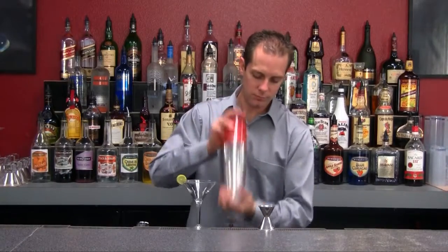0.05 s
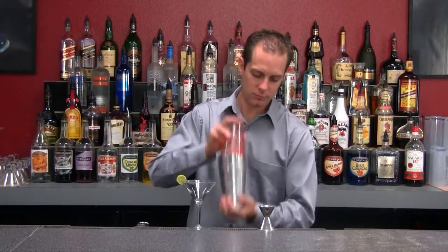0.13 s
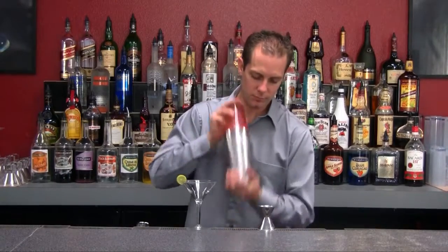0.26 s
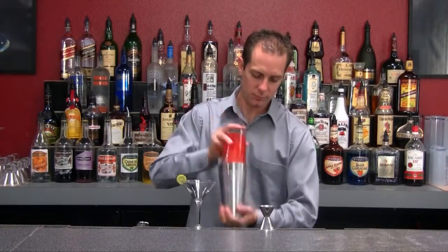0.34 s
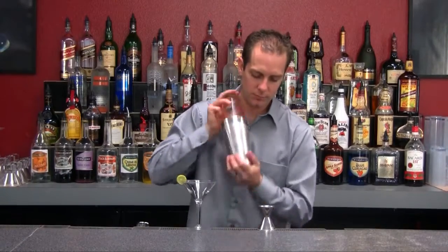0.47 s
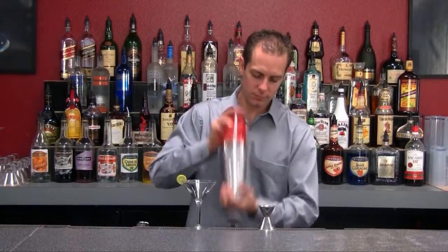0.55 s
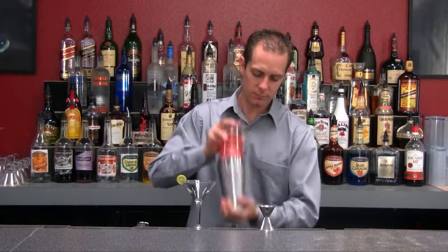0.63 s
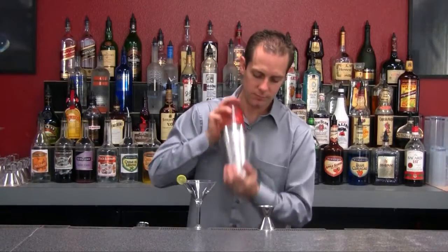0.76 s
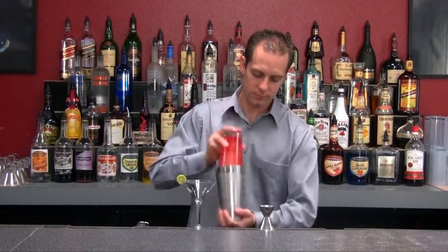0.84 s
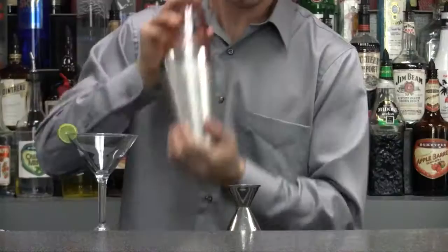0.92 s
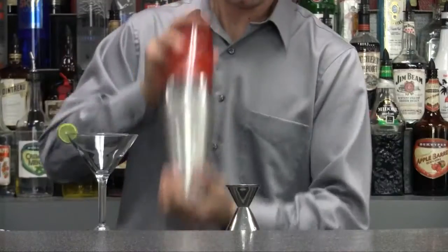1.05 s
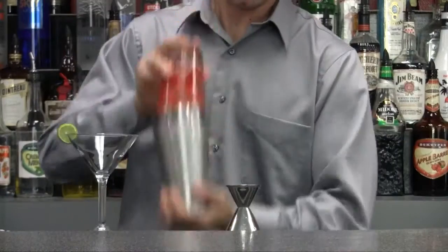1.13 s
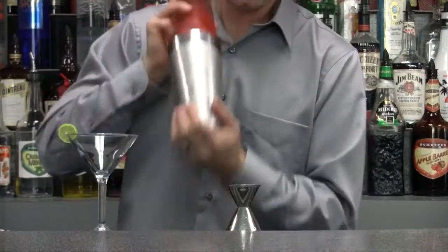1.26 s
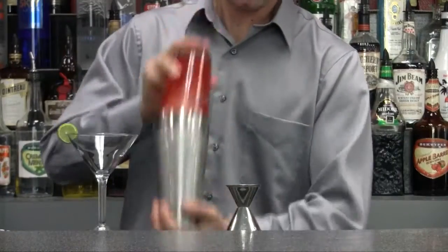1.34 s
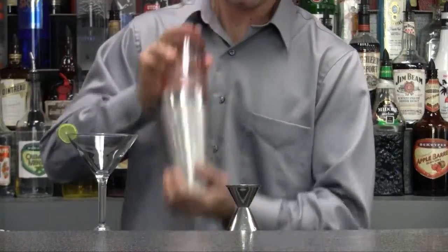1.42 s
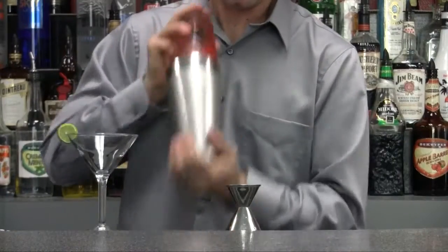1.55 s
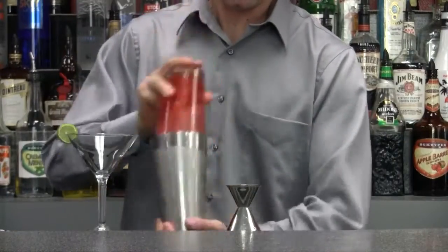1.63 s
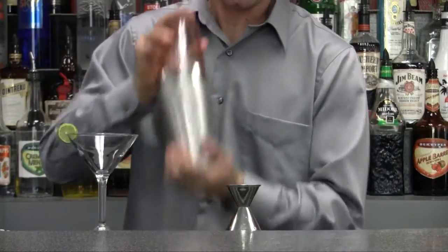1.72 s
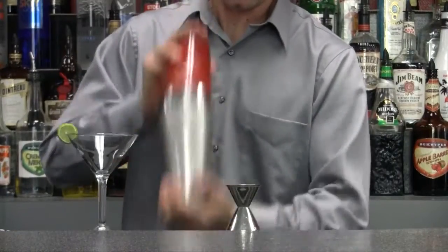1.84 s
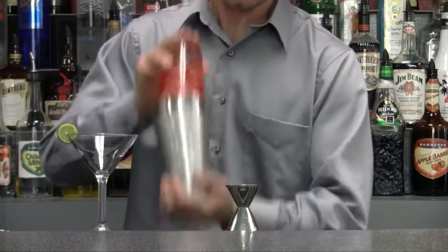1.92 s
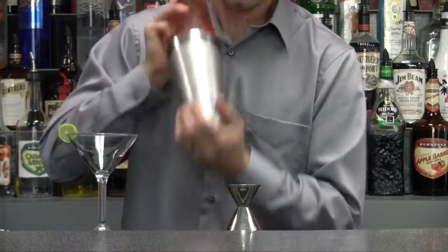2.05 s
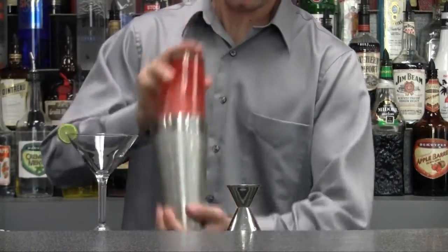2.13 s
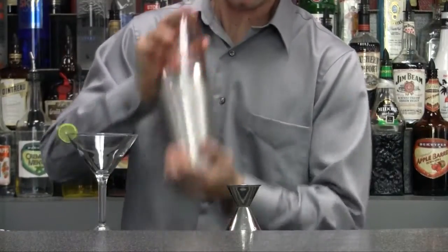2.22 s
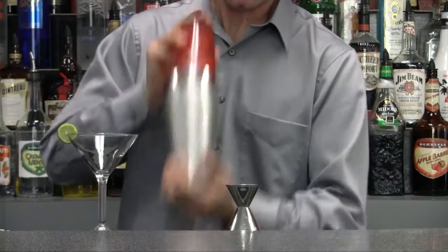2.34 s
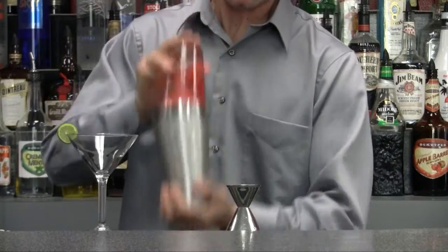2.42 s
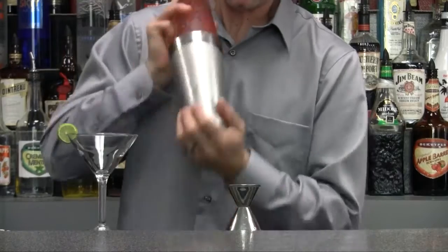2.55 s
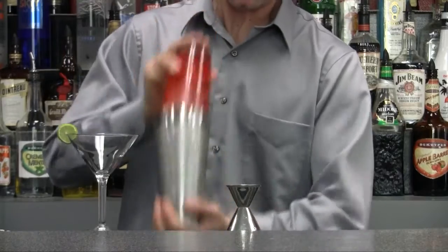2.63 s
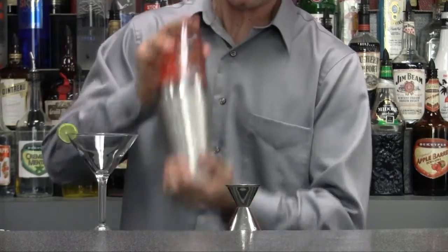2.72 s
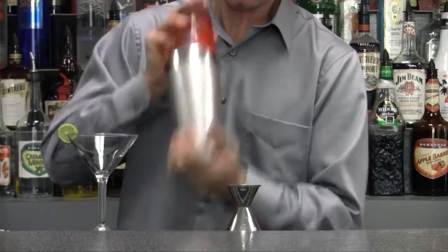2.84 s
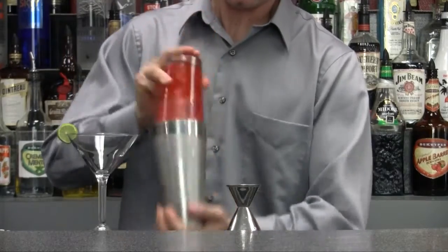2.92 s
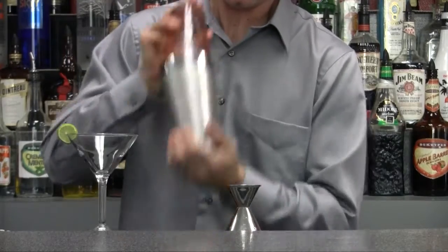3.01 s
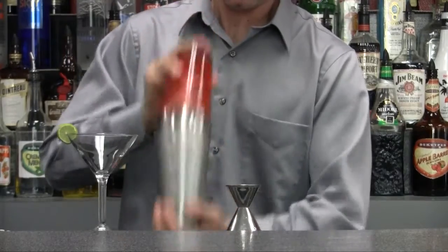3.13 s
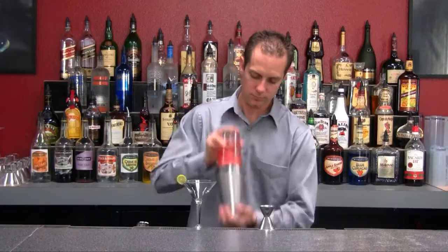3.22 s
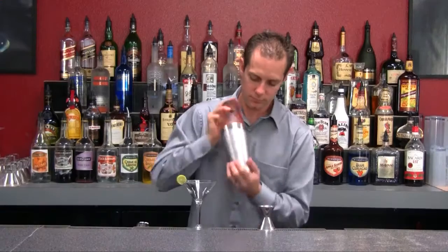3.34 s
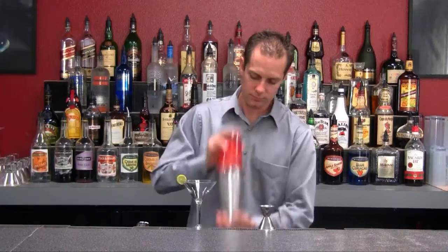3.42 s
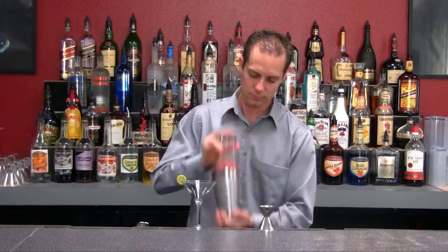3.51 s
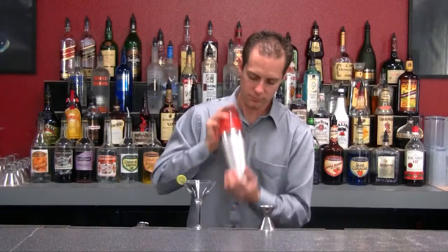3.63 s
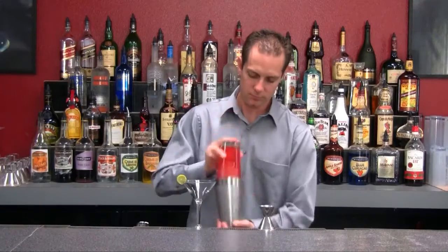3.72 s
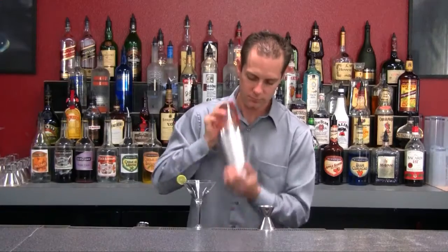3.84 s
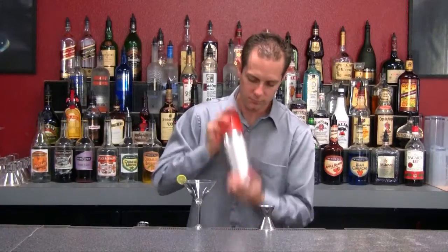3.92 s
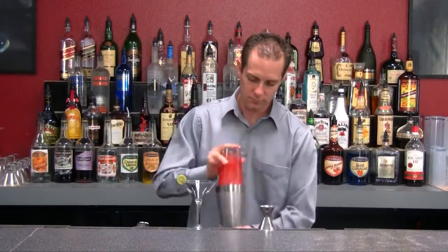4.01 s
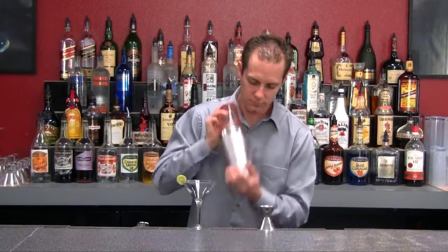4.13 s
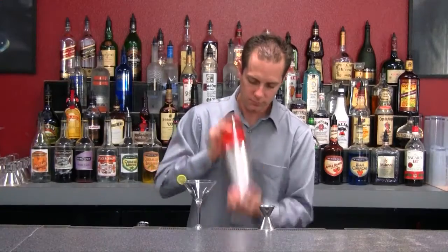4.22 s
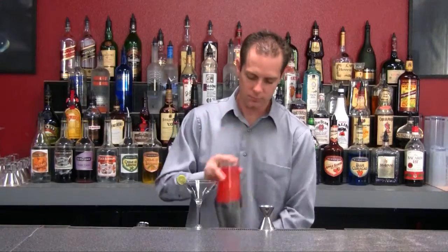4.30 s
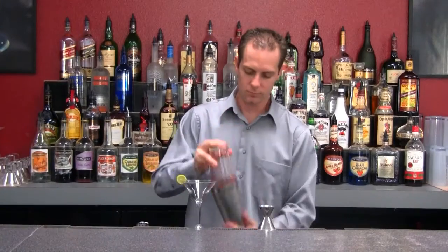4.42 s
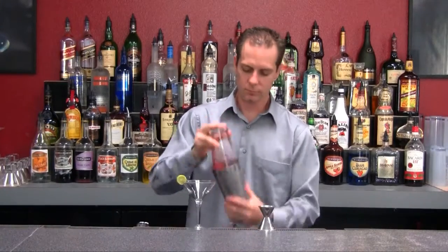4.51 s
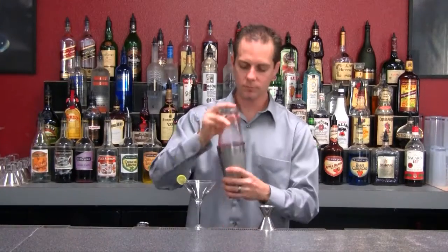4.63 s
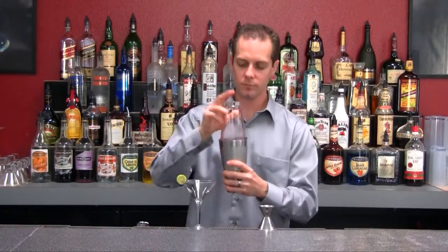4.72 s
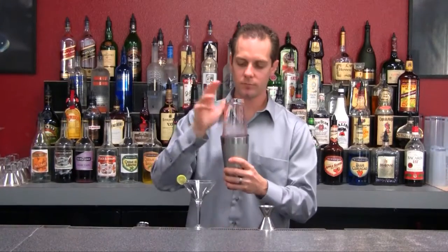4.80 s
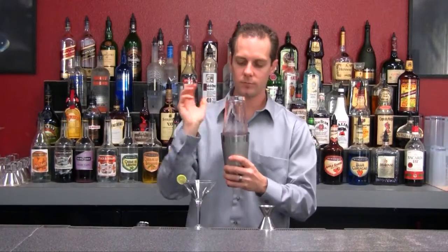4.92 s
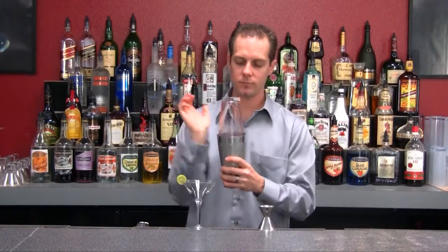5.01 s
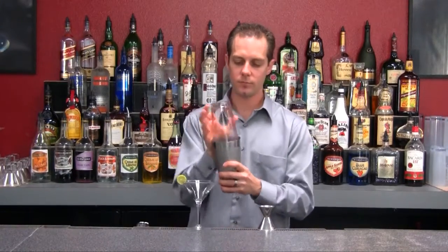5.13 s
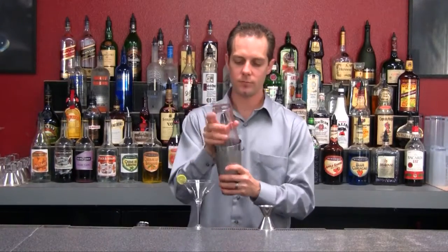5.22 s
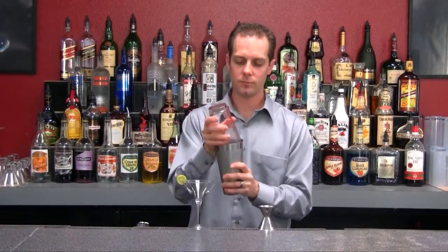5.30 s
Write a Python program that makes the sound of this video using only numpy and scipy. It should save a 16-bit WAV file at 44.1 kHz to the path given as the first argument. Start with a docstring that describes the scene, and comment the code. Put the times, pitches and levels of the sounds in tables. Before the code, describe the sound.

From the very start, ice and liquid are shaken hard in a steel cocktail shaker capped with a glass. The rhythm is quick and even, nearly four shakes a second, each a softer back stroke followed by a loud slam. Every slam brings a bright crunch of ice, hollow clunks and a brief ring of steel, with liquid sloshing underneath and single cubes clicking out of the rattle. The strokes slow very slightly, and the last lands at about 4.4 seconds. The ice settles and dies away by 4.8 seconds. After a short pause, at about 5.1 seconds, a hand knocks the tin once, a dull thump with a sharp crack as the seal breaks. The ice stirs faintly around 5.3 seconds. The shaker sounds fairly close, with the short echo of a small room and a soft, low rush of ventilation throughout.

```python
"""Shaking a cocktail

Ice and liquid are shaken to and fro in a steel tin capped with a mixing glass, behind a bar.
Each stroke throws the load against one end: ice crunches, liquid sloshes, tin and glass ring briefly.
The ice settles, then the heel of a hand knocks the tin to break the seal.
A small room echoes it all, over a soft rush of ventilation."""
import sys
import numpy as np
from scipy import signal
from scipy.io import wavfile
from scipy.ndimage import uniform_filter1d

SR = 44100
rng = np.random.default_rng(int(sys.argv[2]) if len(sys.argv) > 2 else 0)


def store_pcm(level_fs):
    """Save levels as 16-bit WAV."""
    pcm = np.round(np.clip(level_fs, -1, 1) * 32767).astype(np.int16)
    wavfile.write(sys.argv[1], SR, np.atleast_2d(pcm).T)


N = 236400
TIME = np.arange(N) / SR

# Levels in the tables are relative: each function sets its own overall loudness.
# One row a shake, a gentle back stroke and then a slam into the hard end:
# slam_start_s, rise_s, slam_db, clunk_db, back_stroke_earlier_s, back_stroke_db
SHAKE_STROKES = [(.162, .028, 0.5, -2, .16, -2.5), (.418, 0.027, 0.5, -2, 0.12, 0.5),
                 (0.671, 0.032, 1, -2.5, 0.12, -2.5), (.940, 0.033, 0, -4.5, 0.13, -1),
                 (1.188, 0.035, .5, -3, 0.12, -0.5), (1.447, 0.054, -0.5, -2.5, 0.12, 1.5),
                 (1.740, 0.024, 1.5, -1.5, 0.13, -1), (1.982, 0.034, 1.5, -9, 0.13, 0),
                 (2.242, 0.032, 2.5, -5, 0.13, 0), (2.490, 0.046, -1, -4.5, 0.11, 0.5),
                 (2.724, 0.066, -1, -0.5, 0.1, .5), (2.998, 0.043, -0.5, -2.5, 0.14, 0),
                 (3.260, .022, 0.5, 4, 0.13, -1), (3.520, 0.035, .5, -1, .118, 0),
                 (3.800, 0.04, 1.5, 2, 0.12, -1), (4.082, 0.022, 1.5, -2, 0.15, -8),
                 (4.375, 0.046, 0, -2.5, 0.13, -1.5)]
# Tone colour of ice chips: pitch_hz, level_db
ICE_COLOUR = [(120, -39.5), (400, -14.5), (900, -11.5), (1250, -6), (2000, -2), (3100, 1.5), (3500, 1),
              (4600, 2), (5800, 0), (7000, -5), (8500, -10.5), (10000, -16), (11800, -21.5)]
# Tones of the steel tin, damped by hands and liquid: pitch_hz, level_db, ring_s
TIN_TONES = [(1033, -10, 0.0085), (1253, -2, 0.019), (1462, -1, 0.042), (1596, 3.5, 0.023),
             (1772, 5, 0.016), (2580, -16, 0.072), (2780, -15, .07), (4320, -20, 0.049)]


def amp(db):
    """Turns decibels into a factor to multiply by."""
    return 10 ** (np.asarray(db) / 20)


def unit(x):
    """Scales a sound to a total energy of 1."""
    return x / np.sqrt(np.sum(x ** 2) + 1e-20)


def read(points, hz):
    """Looks up a pitch in a table, sliding between the rows on a musical (log) scale."""
    row_hz, value = np.transpose(points)
    return np.interp(np.log(hz + 1), np.log(row_hz + 1), value)


def add(mix, start_s, sound):
    """Mixes a sound in at the given time."""
    part = mix[max(round(start_s * SR), 0):][:len(sound)]
    part += sound[:len(part)]


def through(x, response):
    """Lets every sample of x set off the response (convolution), keeping the length of x."""
    return signal.oaconvolve(x, response)[:len(x)]


def low_cut(x, hz):
    """Cuts away the lowest bass below hz."""
    return signal.sosfilt(signal.butter(2, hz, "highpass", fs=SR, output="sos"), x)


def colour(points, size=2048):
    """The shortest click with this tone colour, for use as a filter."""
    hz = abs(np.fft.fftfreq(size, 1 / SR))
    log_gain = np.log(amp(read(points, hz)))
    spectrum = np.exp(np.conj(signal.hilbert(log_gain)))  # packs the energy at the start
    return unit(np.fft.ifft(spectrum).real[:size // 2])


def ring(tones, detune, uneven, contact_s=.0007, size=6000):
    """One blow: each tone dies by 60 dB in ring_s; the spot struck shifts its strength and pitch a bit."""
    t = TIME[:size]
    ringing = np.zeros(size)
    for hz, db, ring_s in tones:
        fade = rng.choice([-1, 1]) * amp(db - 60 * t / ring_s)
        share = np.exp(uneven * rng.standard_normal())
        pitch_hz = hz * (1 + detune * rng.standard_normal())
        ringing += fade * share * np.sin(2 * np.pi * pitch_hz * t)
    return unit(ringing * (1 - np.exp(-t / contact_s)))


def ping(hz, cycles, size=2400):
    """A short hollow tone that swells for this many cycles, then dies."""
    age = hz * TIME[:size] / cycles
    return unit(age * np.exp(-age) * np.sin(2 * np.pi * (hz * TIME[:size] + rng.random())))


def chip(crumble_s, size=700):
    """One contact: a tiny burst of noise, as when ice crumbles."""
    return unit(rng.choice([-1, 1], size) * np.exp(-TIME[:size] / crumble_s))


def smooth(x, samples):
    """Evens out quick changes by averaging twice."""
    return uniform_filter1d(uniform_filter1d(x, samples), samples)


def impacts(per_s, spread_db):
    """Random collisions as clicks, evened out to a fairly steady loudness."""
    force = amp(spread_db * np.minimum(rng.exponential(1, N), 4)) * rng.choice([-1, 1], N)
    clicks = force * (rng.random(N) < per_s / SR)
    power = smooth(clicks ** 2, samples=900)
    return clicks / np.sqrt(abs(power) + 0.44 * np.mean(clicks ** 2))


def clumps(depth):
    """Chips land in loose bunches, so their force wavers from moment to moment."""
    waver = unit(smooth(rng.standard_normal(N), samples=500)) * np.sqrt(N)
    return np.exp(depth * waver - depth ** 2)


def landing(age_s, rise_s, fall_s):
    """The load piles up against the end, then comes to rest."""
    piling_up = np.sqrt(np.clip(age_s / rise_s, 0, 1))
    return piling_up * np.exp(-np.maximum(age_s - rise_s, 0) / fall_s)


def shaking(slam_db, back_db, lag_s, back_lag_s):
    """Force on one part of the load over time: each shake is a back stroke, then a slam."""
    power, age_s = np.zeros(N), TIME[:SR // 2]
    for start_s, rise_s, slam_level, _, earlier_s, back_level in SHAKE_STROKES:
        back_stroke = amp(back_db + back_level) * landing(age_s, rise_s=0.056, fall_s=0.039)
        slam = amp(slam_db + slam_level) * landing(age_s, rise_s, fall_s=0.033)
        add(power, start_s - earlier_s + back_lag_s, back_stroke ** 2)
        add(power, start_s + lag_s, slam ** 2)
    return np.sqrt(power)


def ventilation(level_db=-53.5):
    """A soft, low rush of air."""
    # Tone colour of the moving air: pitch_hz, level_db
    air_colour = [(18, -66), (30, -36), (122, -15), (153, -9), (178, -15), (359, -17), (407, -26),
                  (761, -27.5), (978, -26), (2130, -34), (3880, -34), (6910, -41.5), (12000, -54),
                  (15600, -82.5), (22000, -120)]
    return amp(level_db) * through(rng.standard_normal(N), colour(air_colour, size=8192))


def echoes(tail_db=-7.0, early_db=-9.0, bass_db=1.5, bass_hz=600, size=256):
    """Early echoes from the counter and bottles, then a tail in which each pitch dies at its own pace."""
    # Time the room's echo takes to fall by 60 dB: pitch_hz, fade_s
    fade_times = [(120, 0.46), (500, 0.71), (2000, 0.49), (5000, 0.36), (11000, 0.72)]
    t = TIME[:SR * 3 // 4]
    bounces = rng.choice([-1., 1.], len(t)) * (rng.random(len(t)) < 4000 / SR)
    early = unit(bounces * (t > .002) * np.exp(-t / 0.0019))
    hz, age_s, bands = signal.stft(bounces * (t > .01), SR, nperseg=size)
    warmth_db = bass_db / (1 + (hz[:, None] / bass_hz) ** 4)
    fade_db = 60 * age_s / read(fade_times, hz)[:, None]
    _, tail = signal.istft(bands * amp(warmth_db - fade_db), SR, nperseg=size)
    return amp(tail_db) * unit(tail[:len(t)]) + amp(early_db) * early


def room(x, positions=5, rounds_per_s=2.3):
    """The shaker moves, so its sound passes round several sets of echoes."""
    turns = TIME * rounds_per_s - np.arange(positions)[:, None] / positions
    shares = np.maximum(np.cos(2 * np.pi * turns), 0) ** 4
    shares /= np.linalg.norm(shares, axis=0)
    return sum(through(x * share, echoes()) for share in shares)


def air_column(count=4):
    """Ice brushing along the wall makes the air inside ring, mostly between the slams."""
    # Tones of the air space left open on the back stroke: pitch_hz, level_db, ring_s
    air_tones = [(686, -3, 0.031), (1567, 1, 0.07), (2380, -3.5, 0.097), (3065, 3, 0.074),
                 (4460, -7, 0.045)]
    force = shaking(slam_db=-37.5, back_db=-27.0, lag_s=0.014, back_lag_s=0.012) / np.sqrt(count)
    return sum(through(force * impacts(per_s=230, spread_db=-4.0),
                       ring(air_tones, detune=0.014, uneven=0.23)) for _ in range(count))


def liquid(flight_db=-13, flight_s=0.029, lead_s=0.016, fade_db_per_s=0.48):
    """Churned bubbles, hushed while the liquid flies to the hard end; the slosh softens as it froths."""
    # Tone colour of the churned liquid: pitch_hz, level_db
    slosh_colour = [(50, -11), (130, -16), (280, -5.5), (400, -4.5), (520, 1), (660, 2.5), (820, -1),
                    (980, 2), (1300, -8.5), (2200, -19)]
    in_flight = sum(np.exp(-((TIME - slam_s + lead_s) / flight_s) ** 2) for slam_s, *_ in SHAKE_STROKES)
    force = shaking(slam_db=-26.0, back_db=-31, lag_s=.003, back_lag_s=-0.0027)
    force *= amp(flight_db * in_flight - fade_db_per_s * TIME)
    pitches = np.geomspace(240, 1400, num=16)
    bubbles = np.zeros(N)
    for hz in pitches:
        pops = impacts(per_s=54, spread_db=0.0)
        bubbles += np.sqrt(hz / pitches.sum()) * through(pops, ping(hz, cycles=1.91))
    splashes = 2.4 * impacts(per_s=1500, spread_db=3.5)
    churn = through(bubbles + splashes, colour(slosh_colour))
    return force * unit(churn) * np.sqrt(N)


def tin(count=8):
    """Larger cubes drum on the steel."""
    force = shaking(slam_db=-20.5, back_db=-31.0, lag_s=0.0007, back_lag_s=0.039) / np.sqrt(count)
    return sum(through(force * impacts(per_s=90, spread_db=2.5),
                       ring(TIN_TONES, detune=0.028, uneven=0.26)) for _ in range(count))


def clunk_pitch(time_s, start_hz=2800, drop_hz_per_s=75):
    """The clunks deepen as the shaking goes on."""
    return start_hz - drop_hz_per_s * time_s


def clunks(level_db=-18.5, fall_s=.036, count=24):
    """The load hits the hard end in a cluster of hollow clunks."""
    out = np.zeros(N)
    for start_s, rise_s, _, clunk_db, *_ in SHAKE_STROKES:
        span_s = rise_s + 2 * fall_s
        gain = amp(level_db + clunk_db) * np.sqrt(span_s * SR / count)
        for k, (delay, pitch, weight) in enumerate(rng.random((count, 3))):
            age_s = span_s * (k + delay) / count
            force = gain * landing(age_s, rise_s, fall_s) * (0.262 + 1.3 * weight)
            hz = clunk_pitch(start_s) * (0.785 + .32 * pitch)
            add(out, start_s + age_s, force * ping(hz, cycles=1.92))
    return out


def stray_cubes(tick_db=-24, tin_db=-29, clunk_db=-30, spread_db=8, last_s=.025, window_s=.065):
    """Late in every back stroke two cubes fly loose and hit the wall at random: extra rows for cubes()."""
    hits = []
    for slam_s, *_, back_db in SHAKE_STROKES:
        for when, *shares in rng.random((2, 4)):
            levels_db = back_db + np.array([tick_db, tin_db, clunk_db])
            scatter_db = spread_db * (np.array(shares) - .5)
            hits.append((slam_s - last_s - window_s * when, *(levels_db + scatter_db)))
    return hits


def cubes(tick_db=23.5, tin_db=23.5, clunk_db=21.5, detune=0.041):
    """Single hard hits: a tick of ice, a ring of steel and a clunk whose pitch varies with cube size."""
    # Whole cubes that stand out of the rattle, and last a sharp tick as the glass is lifted: start_s, tick_db,
    # tin_db, clunk_db
    cube_hits = [(0.159, -28.5, -39.5, -14), (0.1803, -15.5, -17, -23), (0.371, -20, -28, -40),
                 (0.4243, -19, -20, -14), (0.4433, -25, -18.5, -12), (0.5312, -15, -47, -37),
                 (.5951, -17, -38, -24), (0.6968, -29, -19.5, -15), (0.9124, -39.5, -18, -30),
                 (0.943, -16, -21, -13), (1.1028, -17.5, -27, -38), (1.492, -22, -18, -7.5),
                 (1.7462, -17, -17, -21), (1.8773, -17, -25, -24), (2.0096, -20, -16.5, -18.5),
                 (2.0542, -13.5, -34, -42), (2.2472, -17, -15, -20), (2.4991, -23.5, -16, -37),
                 (2.5235, -22, -15, -8.5), (2.6145, -16.5, -36.5, -31), (2.7243, -21, -27, -10),
                 (2.7624, -17, -14.5, -17.5), (2.998, -17.5, -22.5, -30), (3.0367, -19.5, -31.5, -24),
                 (3.1769, -16.5, -38, -23), (3.2643, -25, -17, -9), (3.429, -15, -27, -33),
                 (3.5288, -34, -18.5, -16), (3.6593, -20.5, -39, -40), (3.7052, -34, -45, -16),
                 (3.7422, -15, -18.5, -19), (3.8032, -17.5, -19, -34), (4.0223, -20.5, -34, -20),
                 (4.0433, -40.5, -23, -44), (4.2506, -19.5, -28, -24), (4.378, -22, -22.5, -25),
                 (4.4229, -18, -20, -23), (4.5735, -26, -36, -48), (4.68, -37, -49, -52),
                 (5.3555, -33.5, -48, -47)]
    ticks, tones = np.zeros(N), np.zeros(N)
    for start_s, tick_level, tin_level, clunk_level in stray_cubes() + cube_hits:
        add(ticks, start_s, amp(tick_level + tick_db) * chip(crumble_s=0.004))
        steel = ring(TIN_TONES, detune=0.025, uneven=0.308, contact_s=0.00054)
        add(tones, start_s, amp(tin_level + tin_db) * steel)
        clunk_hz = clunk_pitch(start_s) * (1 + detune * rng.standard_normal())
        add(tones, start_s, amp(clunk_level + clunk_db) * ping(clunk_hz, cycles=2.3))
    return tones + through(ticks, colour(ICE_COLOUR))


def chinks(force, per_s, spread_db, cycles):
    """Whole cubes ring like glass, each at a pitch of its own."""
    out = np.zeros(N)
    for when, pitch, weight, length in rng.random((int(per_s * N / SR), 4)):
        strength = force[int(when * N)] * amp(spread_db * (weight - 2.0)) * np.sqrt(SR / per_s)
        hz = 2800 + 4400 * pitch ** 1.3
        add(out, when * N / SR, strength * ping(hz, cycles * (.5 + length)))
    return out


def ice(swirl_db=-6.0, crunch_db=-3.5, clink_db=-5.5, chink_db=-2.0):
    """Many small collisions: fine crunch, chips that each have their own pitch, and whole cubes."""
    # Loose ice drifting between strokes, settling, then stirred as the glass loosens: time_s, level_db
    swirl_levels = [(0, -22), (.9, -19.5), (1.7, -23), (4.4, -26), (4.56, -32), (4.68, -39), (4.8, -46),
                    (4.95, -65.5), (5.29, -46), (5.36, -37.5)]
    landed = shaking(slam_db=-16.5, back_db=-20.5, lag_s=0.0012, back_lag_s=-0.0022)
    drifting = amp(swirl_db + np.interp(TIME, *np.transpose(swirl_levels)))
    force = landed + drifting
    crunch = impacts(per_s=4200, spread_db=3.5) * clumps(depth=0.12)
    pitches = np.geomspace(1100, 11000, num=18)
    clinks = np.zeros(N)
    for hz in pitches:
        hits = impacts(per_s=150, spread_db=3.0) * clumps(depth=0.48)
        clinks += np.sqrt(hz / pitches.sum()) * through(hits, ping(hz, cycles=1.46))
    rattle = force * (amp(crunch_db) * crunch + amp(clink_db) * clinks)
    glassy = amp(chink_db) * chinks(force, per_s=210, spread_db=11.5, cycles=8.1)
    return through(rattle + glassy, colour(ICE_COLOUR))


def knock(thump_db=27.0, crack_db=23.0):
    """The hand thumps the tin; the glass slips in the rim with a crack."""
    # A soft blow and then the seal cracking: start_s, thump_db, crack_db
    blows = [(5.1260, -51, -40), (5.1294, -25.5, -27), (5.1317, -42, -19), (5.1355, -48, -22.5),
             (5.1425, -41, -26)]
    # Dull tones of the held, filled shaker: pitch_hz, level_db, ring_s
    body_tones = [(111, -15, 0.065), (280, 4, 0.035), (338.8, -11.5, 0.024), (508, -6, 0.024)]
    # Tone colour of the glass slipping in the steel rim: pitch_hz, level_db
    rim_colour = [(60, -14), (130, 2), (300, 2), (720, -10), (1000, 7), (1170, -4), (1520, 11), (1850, 1),
                  (2700, 1), (4200, 5.5), (5200, -0.5), (6800, -2.5), (8500, -15.5), (11800, -19)]
    cracks, thumps = np.zeros(N), np.zeros(N)
    for start_s, thump_level, crack_level in blows:
        thump = ring(body_tones, detune=.005, uneven=.05, contact_s=0.00018)
        add(thumps, start_s, amp(thump_level + thump_db) * thump)
        add(cracks, start_s, amp(crack_level + crack_db) * chip(crumble_s=0.0032))
    return thumps + through(cracks, colour(rim_colour))


def scene():
    """The shaker in the bar room, as one channel."""
    load = ice() + liquid() + tin() + clunks() + air_column() + cubes()
    shaker = low_cut(load, hz=157) + low_cut(knock(), hz=80)
    return (shaker + room(shaker) + ventilation())[None]


def record(dry, ceiling=1.34, top_hz=11900):
    """Rounds off the loudest peaks, then cuts the highest treble."""
    rounded = ceiling * np.tanh(dry / ceiling)
    lowpass = signal.firwin(401, top_hz, window=("kaiser", 9), fs=SR)
    return signal.oaconvolve(rounded, lowpass[None], "same")


dry = scene()
out = record(dry)
store_pcm(out)
```